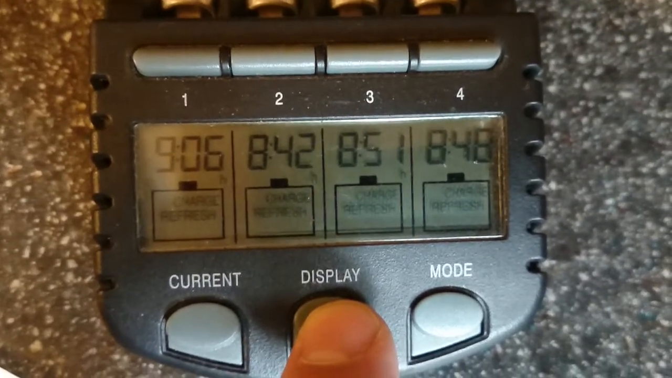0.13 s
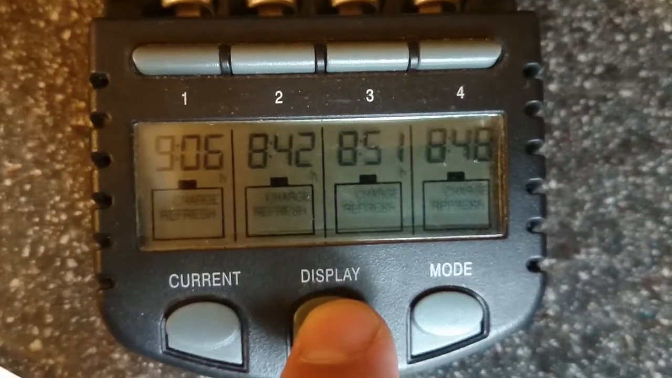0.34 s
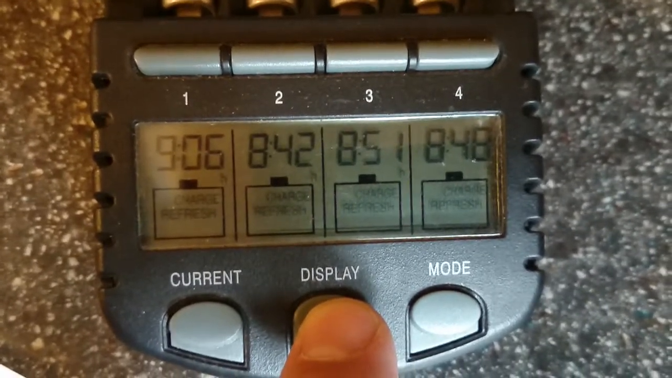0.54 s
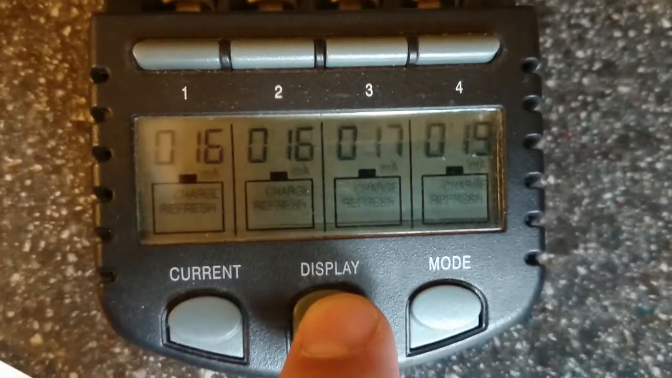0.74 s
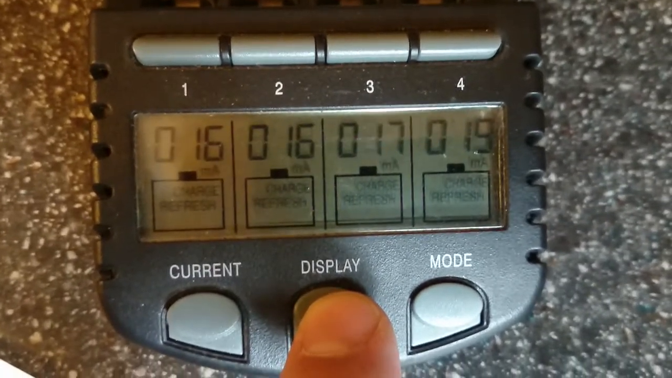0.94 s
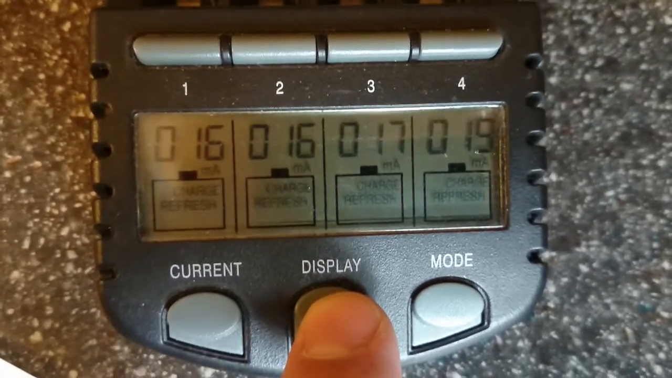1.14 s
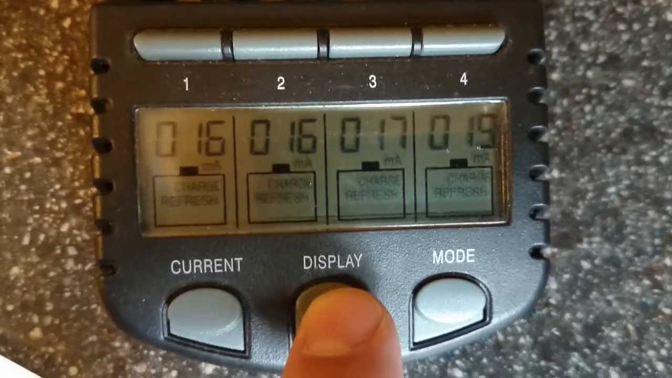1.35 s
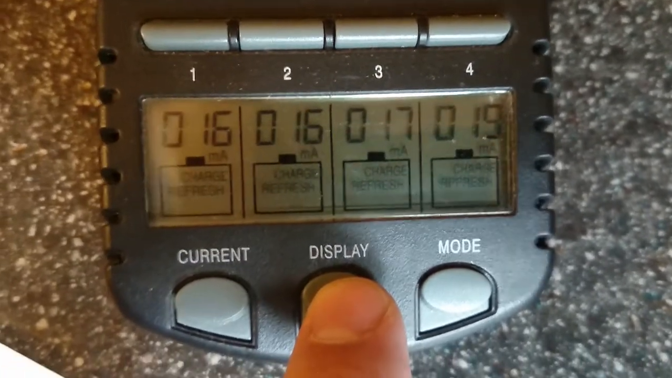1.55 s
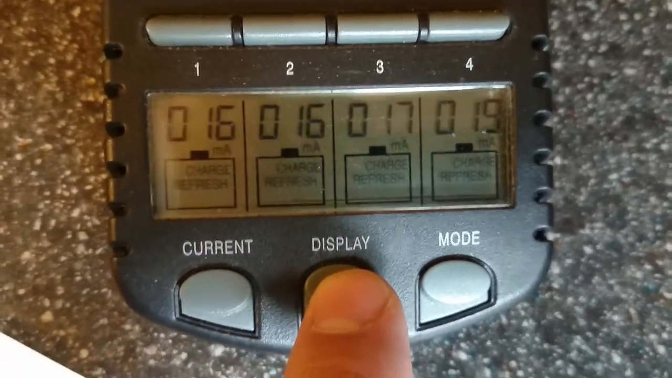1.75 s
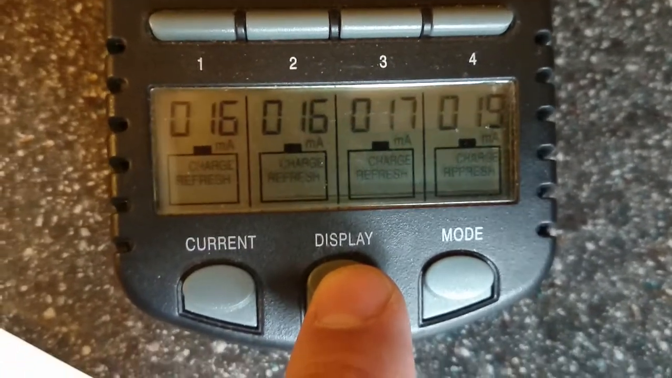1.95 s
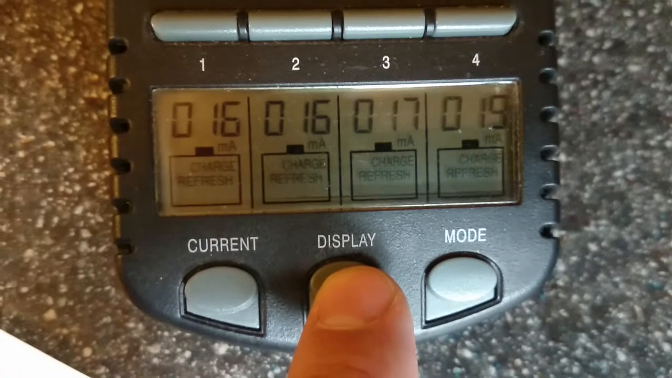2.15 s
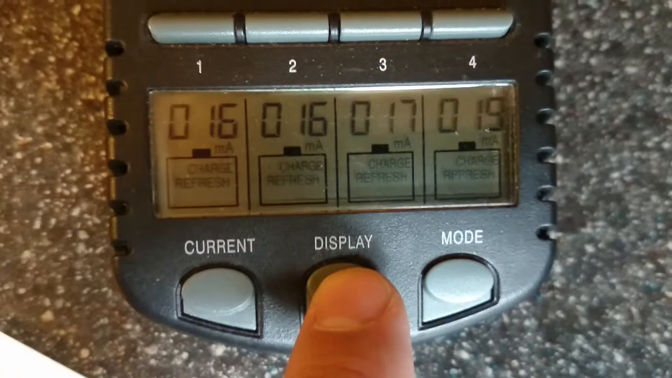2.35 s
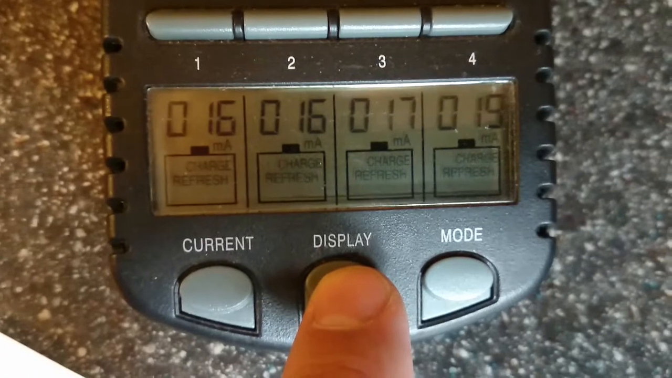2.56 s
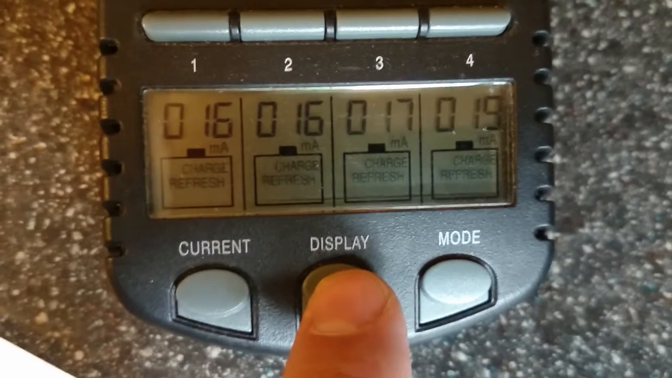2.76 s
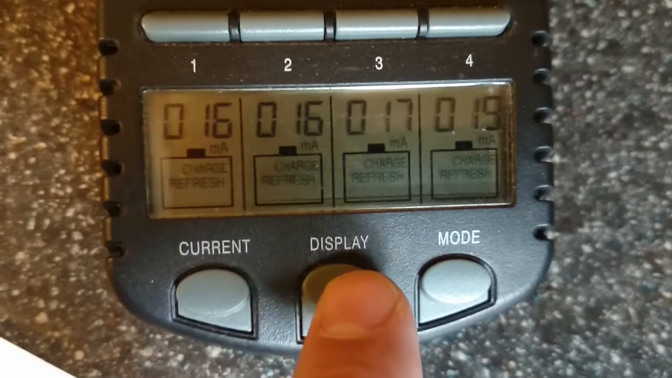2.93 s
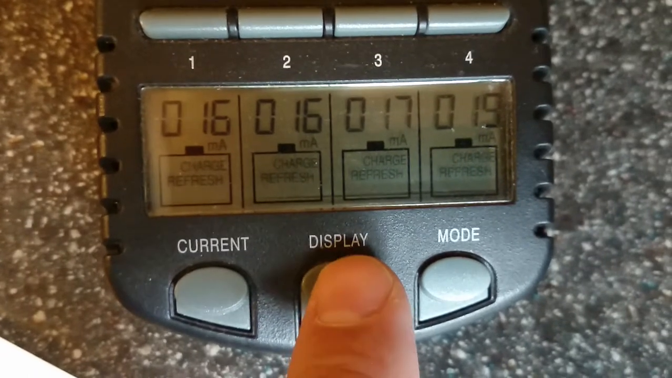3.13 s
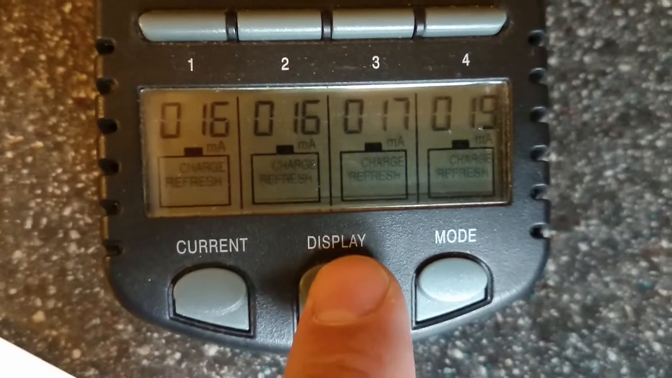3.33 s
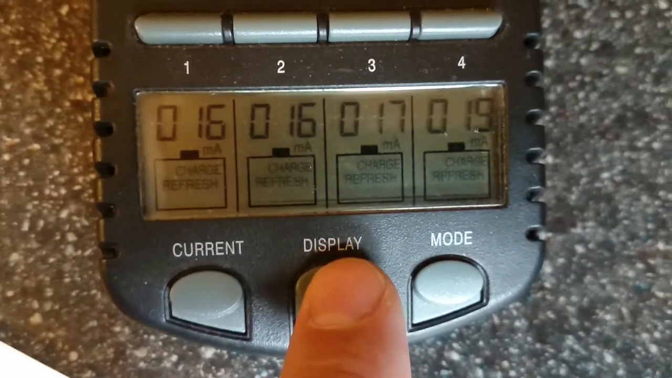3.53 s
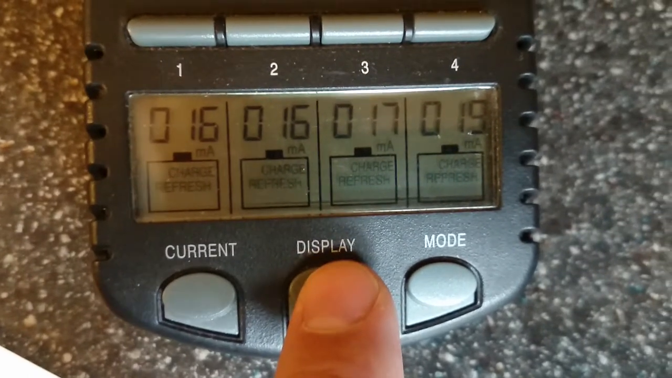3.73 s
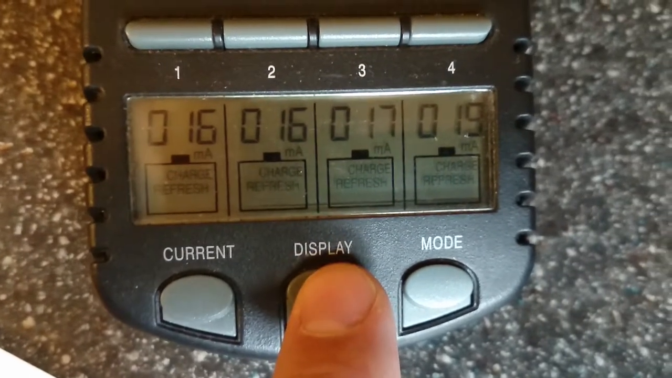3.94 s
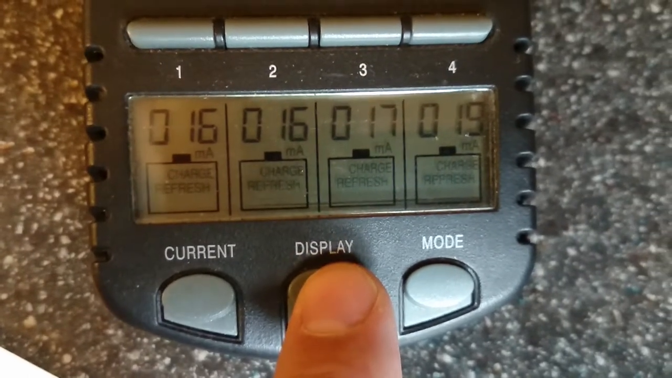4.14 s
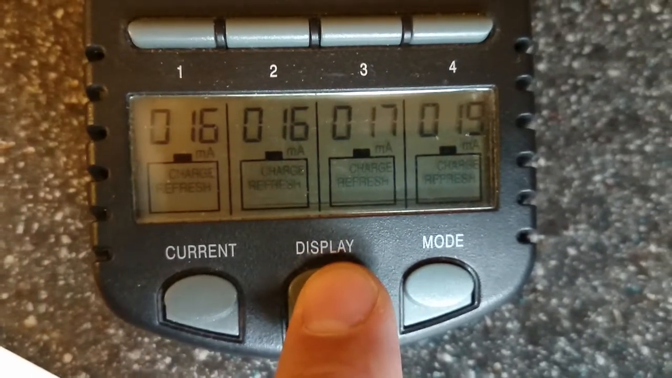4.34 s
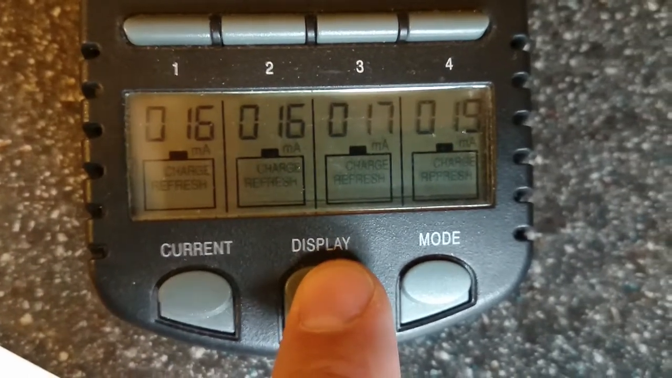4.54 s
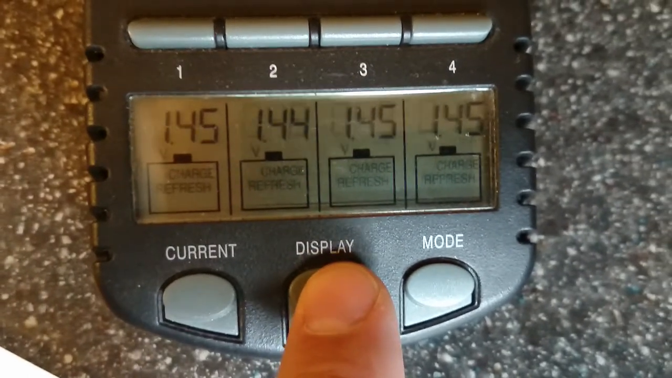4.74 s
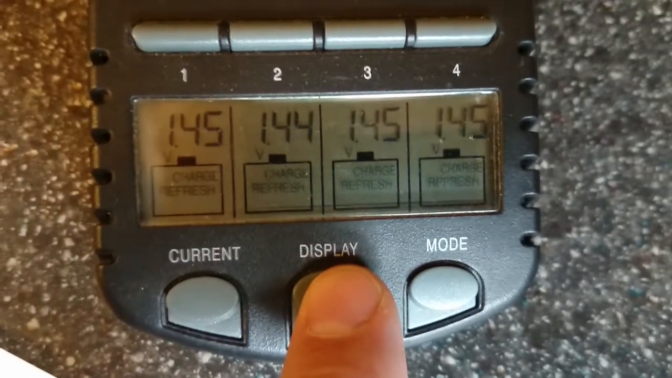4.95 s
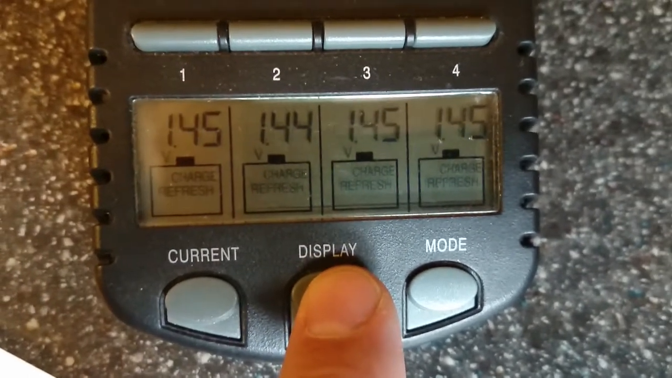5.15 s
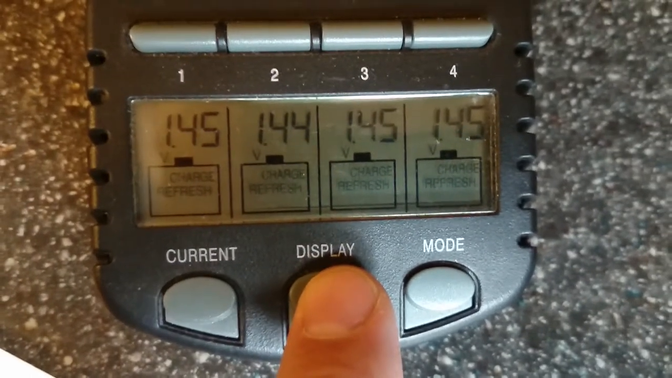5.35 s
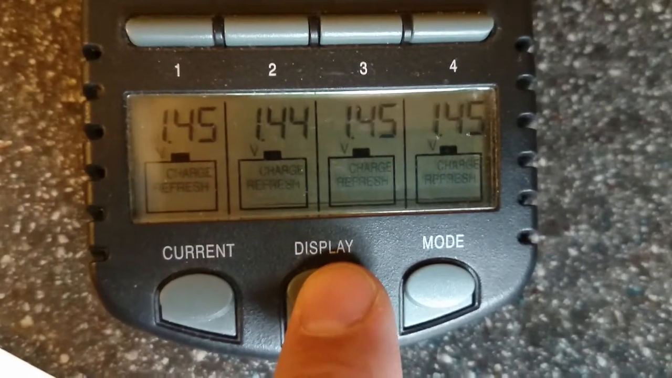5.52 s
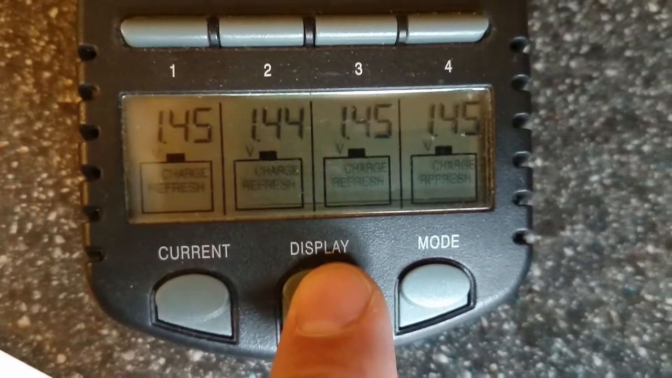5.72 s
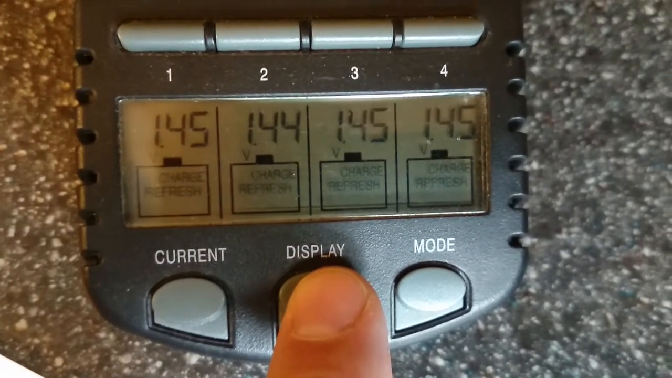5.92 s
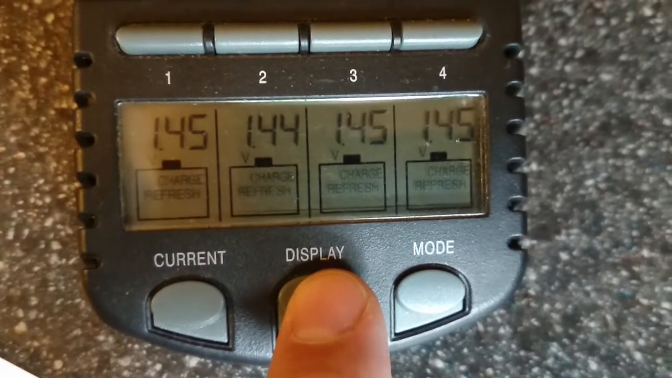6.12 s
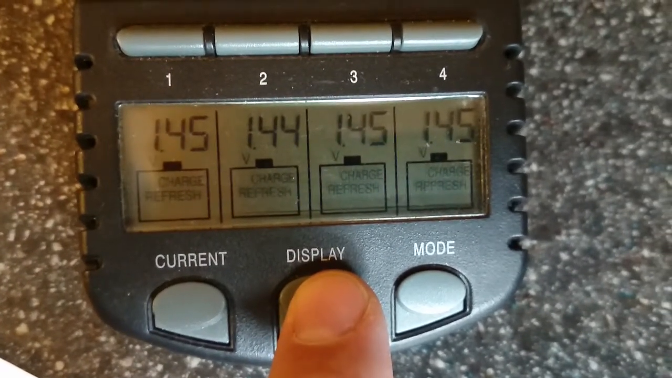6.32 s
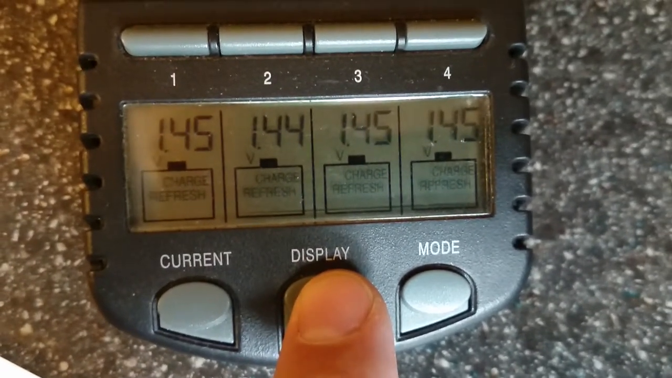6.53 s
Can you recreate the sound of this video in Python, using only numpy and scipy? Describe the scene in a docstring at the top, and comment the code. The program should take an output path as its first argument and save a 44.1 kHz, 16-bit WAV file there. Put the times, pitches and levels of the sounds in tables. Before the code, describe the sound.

A low room hum, light hiss and a very faint, high electronic buzz run for the whole six and a half seconds or so. A hand-held microphone adds a deep, uneven rumble on the right. After a soft handling thump at 0.5 seconds, a plastic button on a battery charger is pressed with a sharp click at about 0.65 seconds and released with a lighter click at 0.95. Each click is close and dry, with a brief hollow ring from the case and a little room echo. The fingertip nudges the button with faint, dull rubs at about 2.75 and 3.4 seconds, with a soft thump between them. A second crisp press comes at 4.35 seconds and its release at 4.65, with the strongest low thump in between. Two more soft thumps follow around 5.5 seconds, then only the hum and rumble remain.

```python
"""Clicking a charger's button

A finger presses and releases a plastic button on a battery charger twice, on a stone counter in a
quiet room. Each snap is a few quick contacts that ring the case and rock it on its feet; between
presses the finger nudges the button. A hand-held camera adds soft thumps and rumble on its right
microphone, over room hum, hiss and a faint electronic buzz."""
import sys
import numpy as np
from scipy import signal
from scipy.fft import rfft, irfft
from scipy.io import wavfile

SR = 44100
rng = np.random.default_rng(int(sys.argv[2]) if len(sys.argv) > 2 else 0)


def wrap_up_sound(samples):
    """Save the sound to the file named by the first command line argument, as 16-bit audio."""
    columns = np.atleast_2d(samples).T
    # keep every value between -1 and 1, then stretch to whole-number steps
    tamed = np.clip(columns, -1, 1)
    steps = np.round(tamed * 32767).astype(np.int16)
    wavfile.write(sys.argv[1], SR, steps)


N = 294567


def amp(db):
    """Turns decibels into a number to multiply a sound by."""
    return 10 ** (np.asarray(db) / 20)


def read(points, hz, column=1):
    """Reads a table at any frequency, joining its rows by straight lines on a log-frequency axis."""
    table = np.transpose(points)
    return np.interp(np.log(hz + 1), np.log(table[0] + 1), table[column])


def stereo_gains(points, hz):
    """Reads a table's left and right levels as gains."""
    return amp([read(points, hz, column=1), read(points, hz, column=2)])


def add(mix, start, sound):
    """Mixes a sound in at a start time in seconds."""
    part = mix[..., max(round(start * SR), 0):][..., :sound.shape[-1]]
    part += sound[..., :part.shape[-1]]


def fade(t, t60):
    """Dies away by 60 dB in t60 seconds, the fade time."""
    return np.exp(-np.log(1000) * t / np.maximum(t60, 1e-4))


def colour(sound, points, size=2048):
    """Turns each frequency up or down, left and right, as a table says."""
    cepstrum = irfft(np.log(stereo_gains(points, np.fft.rfftfreq(size, 1 / SR))))
    # folding this in half keeps the filter from ringing before the sound arrives
    cepstrum[:, 1:size // 2] *= 2
    cepstrum[:, size // 2 + 1:] = 0
    return signal.oaconvolve(sound, irfft(np.exp(rfft(cepstrum))), axes=1)[:, :N]


# The room's low hum: f/Hz, left/(dB per Hz), right/(dB per Hz)
ROOM_HUM = [(19.6, -89, -100), (58, -85.5, -72.5), (121, -91.5, -86.5), (292, -97, -94.5),
            (484, -103, -101), (730, -105, -105), (1330, -114, -111), (2920, -124, -118),
            (6540, -140, -135)]
# The microphones' hiss: f/Hz, left/(dB per Hz), right/(dB per Hz)
MIC_HISS = [(1070, -114, -110.5), (4000, -113.5, -111.5), (4800, -116, -112.5), (5850, -114.5, -107),
            (6370, -117, -114), (6940, -113, -116), (7800, -105.5, -118), (8420, -107.5, -118),
            (9700, -118.5, -119), (12900, -117.5, -120), (13400, -122.5, -120.5), (15500, -121, -120)]
def hum_and_hiss(shared=0.16):
    """The two microphones share a little of the room's hum, and each makes its own hiss."""
    hz = np.fft.rfftfreq(N, 1 / SR)
    left, other = rfft(rng.standard_normal((2, N)))
    right = shared * left + np.sqrt(1 - shared ** 2) * other
    hum = np.array([left, right]) * stereo_gains(ROOM_HUM, hz)
    hiss = rfft(rng.standard_normal((2, N))) * stereo_gains(MIC_HISS, hz)
    return irfft(hum + hiss, N) * np.sqrt(SR / 2)


def buzz(ticks_per_s=51.2, pitch_hz=10550, width_s=0.00054, left_db=-68, right_db=-86):
    """Faint, regular electronic ticks, each a tiny burst of a high tone."""
    beats = np.diff(np.floor(np.arange(N + 1) * ticks_per_s / SR))
    t = np.arange(-SR // 400, SR // 400) / SR
    tick = np.exp(-.5 * (t / width_s) ** 2) * np.cos(2 * np.pi * pitch_hz * t)
    return amp([[left_db], [right_db]]) * signal.oaconvolve(beats, tick, "same")


# The tone of the grip's rumble: f/Hz, relative level/dB
RUMBLE_TONE = [(3, -2.5), (10, 2.5), (22, -5.5), (33, -6.5), (52, -14.5), (85, -23), (110, -28), (200, -46),
               (400, -55), (1500, -73.5)]
# How the rumble swells and sinks: t/s, relative level/dB
GRIP_LEVEL = [(0.0, -42), (0.2, -40.5), (1.15, -45), (1.4, -37.5), (2.01, -44.0), (2.16, -40),
              (2.76, -40.0), (3.01, -36.5), (3.96, -48.5), (4.11, -37.5), (4.41, -43.5), (4.56, -34.5),
              (4.66, -44.5), (5.72, -39), (5.868, -43.5), (6.02, -39.5), (6.57, -45), (6.67, -38.5)]
def grip_rumble(boost_db=3, left_db=-36):
    """The slow pressure of the hand makes a deep noise in the right microphone."""
    tone = amp(read(RUMBLE_TONE, np.fft.rfftfreq(N, 1 / SR)))
    noise = irfft(rfft(rng.standard_normal(N)) * tone, N)
    grip_db = np.interp(np.arange(N) / SR, *np.transpose(GRIP_LEVEL))
    return amp([[left_db], [0]]) * amp(grip_db + boost_db) * noise / noise.std()


def knock(when, length, swing_share, hz=125, t60=0.025):
    """One soft push, blended with the fading swing of the camera that it sets off."""
    t, lead_s = np.arange(SR // 5) / SR, .01
    push = np.cos(np.pi * np.clip((t - lead_s) / length, -.5, .5)) ** 2
    wobble = np.sin(2 * np.pi * hz * t) * fade(t, t60)
    swing = signal.fftconvolve(np.gradient(push), wobble)[:len(t)]
    out = np.zeros(N)
    add(out, when - lead_s, (1 - swing_share) * push + swing_share * swing / abs(swing).max())
    return out


# Soft pushes of the hand on the camera: t/s, level/dB, length/s, share of swing (0 to 1)
PUSHES = [(0.267, -36.5, .0062, 0.56), (0.4913, -15, 0.0058, 0), (0.799, -32.5, 0.0084, 0.06),
          (4.4855, -9, 0.0042, .2), (4.4869, -28, 0.0018, 0.1), (4.757, -33, 0.0099, 0.4),
          (5.9817, -37, 0.0031, 0.27), (6.173, -36, 0.0033, .6), (6.380, -35.5, 0.0072, 0.46)]
# Jolts of the camera in the grip: t/s, level/dB
JOLTS = [(1.8558, -37), (3.0813, -15), (5.488, -17), (5.5774, -20)]
def hand_thumps(left_db=-50, catch_early_s=0.0018, catch_db=-11.5, jolt_swing=0.84):
    """The right microphone feels the hand: soft pushes, and jolts that catch, pull back and swing on."""
    out = sum(amp(db) * knock(when, length, share) for when, db, length, share in PUSHES)
    for when, db in JOLTS:
        catch = knock(when - catch_early_s, length=0.003, swing_share=jolt_swing)
        pull = knock(when, length=0.0039, swing_share=jolt_swing, hz=75.4, t60=0.092)
        out += amp(db) * (amp(catch_db) * catch - pull)
    return amp([[left_db], [0]]) * out


# The room's echoes: f/Hz, fade time/s, left/dB, right/dB
ECHOES = [(150, 0.74, -8, -4), (288, 0.24, 4.5, -5), (587, 0.46, -3, -6), (880, 0.37, -1.5, -7),
          (1970, 0.48, -13, -10.5), (2500, 0.7, -14.5, -6), (4700, 0.46, -11, -12), (5300, 0.34, -18, 0),
          (5930, 0.53, -7, -8), (6700, 0.59, -15, -9), (8200, 1, -18, -19), (13000, 0.071, -11, -18)]
def room_echoes(sound, first_echo_s=0.0095, size=256):
    """The room sends back a blur of echoes, each band of pitch dying at its own speed."""
    hz, t, bands = signal.stft(rng.standard_normal((2, SR // 2)), SR, nperseg=size)
    tail = signal.istft(bands * fade(t, read(ECHOES, hz)[:, None]), SR, nperseg=size)[1]
    tail *= np.arange(tail.shape[1]) / SR > first_echo_s
    tail /= np.linalg.norm(tail, axis=1, keepdims=True)
    tone = [(f, left, right) for f, _, left, right in ECHOES]
    return colour(signal.fftconvolve(sound, tail, axes=1), tone)


# The fingertip shifting on the button: t/s, length/s, starting level/dB
RUBS = [(2.75, 0.053, -61), (3.422, 0.063, -57.5)]
def finger_rubs(slips_per_s=1100, band_hz=(120, 800), fade_db=-12, left_db=-1):
    """The fingertip sticks and slips on the button: a short, fading run of dull little ticks."""
    out = np.zeros(N)
    muffle = signal.butter(2, band_hz, "bandpass", fs=SR, output="sos")
    for start, length, db in RUBS:
        t = np.arange(0, length, 1 / SR)
        slips = rng.standard_normal(SR) * (rng.random(SR) < slips_per_s / SR)
        slips = signal.sosfilt(muffle, slips)
        add(out, start, amp(db + fade_db * t / length) * slips[:len(t)] / slips.std())
    return amp([[left_db], [0]]) * out


def ring(t, hz, left_db, right_db, t60, left_lead, swell_s=0.0026):
    """One natural note of a struck object swells and dies away, a little out of step in each ear."""
    envelope = np.minimum(t / swell_s, 1) * fade(np.maximum(t - swell_s, 0), t60)
    wave = np.sin(2 * np.pi * hz * t + np.array([[left_lead], [0]]))
    return amp([[left_db], [right_db]]) * envelope * wave


# The plastic case's notes: f/Hz, left/dB, right/dB, fade time/s, head start of the left wave/rad
CASE_NOTES = [(578, -2, 2, 0.054, 0.76), (600, -23, -42, 0.036, 6), (768, -11, -19, 0.13, 3),
              (1077, -12, -7.5, 0.076, 2.5), (1152, -8, -4, 0.037, 4.5), (1304, -13, -2.5, 0.044, 2.5),
              (1566, -15, -8, 0.056, 2.5), (2545, -39, -18.5, 0.098, 3), (3595, -4.5, -4, 0.022, 2.5),
              (4580, -18, -31, 0.022, -0.5), (5350, -3, -13, 0.025, 3.5), (5840, -23, -8.5, 0.022, 4)]
# The button cap's notes: f/Hz, left/dB, right/dB, fade time/s, head start of the left wave/rad
CAP_NOTES = [(1734, -6, -1.5, 0.02, 2), (1928, -11, 3, 0.021, 1.7), (4880, -7, -13, .016, -1.5)]
# Snaps of the switch and nudges of the button, with relative levels for the crack and the ringing:
# t/s, crack/dB, first touch compared with the crack/dB, first gap between contacts/s, dull above/Hz,
# case/dB, hardness/(dB per octave), low cap note/dB, high cap notes/dB, rocking on the feet/dB
SNAPS = [(0.646, -26, -2.5, .0025, 8800, -40, 4.5, -41, -27.5, -40.5),
         (0.9407, -32.5, -7, .0019, 18100, -40.5, -1, -41, -44.5, -46),
         (2.7484, -42.5, -6, .0025, 1200, -67, 1, -50, -59.5, -46),
         (3.4150, -47, 9, 0.0053, 1470, -56.5, -0.5, -50, -56, -48.5),
         (4.3597, -34, 6, .002, 22800, -32.5, 1, -33, -34, -44),
         (4.635, -32, -1, .0029, 16000, -39, 0, -37.5, -34.5, -48.5)]
def charger_ring(delay_s=0.001263):
    """Just after the first touch, the case and button cap ring and the charger rocks on its feet."""
    t, out = np.arange(SR // 3) / SR, np.zeros((2, N))
    case_notes = [ring(t, *note) for note in CASE_NOTES]
    octaves = np.log2(np.array(CASE_NOTES)[:, 0] / 1000)
    cap_low, *cap_high = (ring(t, *note) for note in CAP_NOTES)
    rocking = ring(t, hz=172, left_db=-5, right_db=0, t60=0.11, left_lead=0.25, swell_s=0.011)
    for start, *_, case_db, hardness, low_db, high_db, rocking_db in SNAPS:
        strengths = amp(case_db + hardness * octaves)  # a harder snap favours the high notes
        case = np.tensordot(strengths, case_notes, 1)
        cap = amp(low_db) * cap_low + amp(high_db) * sum(cap_high)
        add(out, start + delay_s, case + cap + amp(rocking_db) * rocking)
    return out


# The tone of one contact in a snap: f/Hz, left/dB, right/dB
CRACK_TONE = [(195, -0.5, 6.5), (393, 0, 9.5), (583, -4.5, 3.5), (930, -7, -3), (2050, 0, -2),
              (2400, -4.5, -10), (3600, -1.5, -7), (4050, -8, -6.5), (4500, -5, -3.5), (6400, -5, -6.5),
              (8260, 3.5, -15), (10300, -6, -12), (12500, -0.5, -23), (13800, -17, -15)]
def switch_cracks(bounce_db=-6.5, slowing=1.25, softening=0.95, right_lag_s=.0004):
    """A first touch, the snap and two ever weaker, slower bounces each tick and shake the shell."""
    t = np.arange(SR // 12) / SR
    direct, into_room = np.zeros((2, 2, N))
    tick, shell = fade(t, t60=0.018), fade(t, t60=0.057)  # noise stands in for the shell's many notes
    envelopes = np.array([tick + amp(-12) * shell, amp(-7) * shell])[:, None]  # direct, into the room
    for start, crack_db, touch_db, gap, dull_hz, *_ in SNAPS:
        for contact in range(4):
            when = start + gap * contact ** slowing
            db = crack_db + (bounce_db * (contact - 1) if contact else touch_db)
            bursts = amp(db) * envelopes * rng.standard_normal((2, 2, len(t)))
            pole = np.exp(-2 * np.pi * dull_hz * softening ** contact / SR)  # softer means less treble
            near, far = signal.lfilter([(1 - pole) ** 2], np.poly([pole, pole]), bursts)
            add(direct[0], when, near[0])
            add(direct[1], when + right_lag_s, near[1])
            add(into_room, when, far)
    return colour(direct, CRACK_TONE), colour(into_room, CRACK_TONE)


def scene(body_echo_db=-9.5):
    """The button in its room, with the sounds of the hand-held camera."""
    cracks, into_room = switch_cracks()
    body = charger_ring() + finger_rubs()
    echoes = room_echoes(into_room + amp(body_echo_db) * body)
    return cracks + body + echoes + hand_thumps() + grip_rumble() + hum_and_hiss() + buzz()


def record(dry, top_hz=15850):
    """Cuts away the very highest treble."""
    low_pass = signal.firwin(511, top_hz, window=("kaiser", 9), fs=SR)
    return signal.oaconvolve(dry, low_pass[None], "same")


dry = scene()
out = record(dry)
wrap_up_sound(out)
```